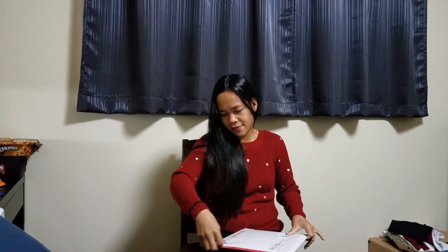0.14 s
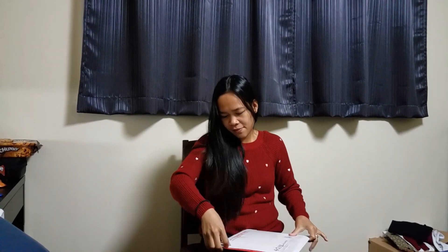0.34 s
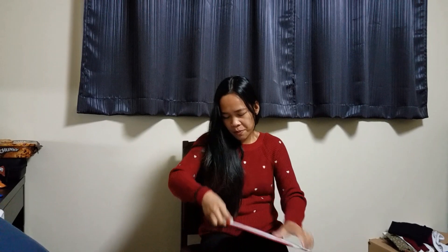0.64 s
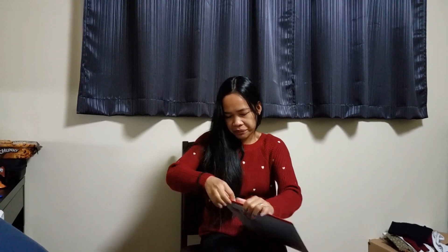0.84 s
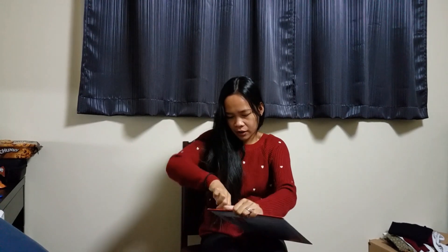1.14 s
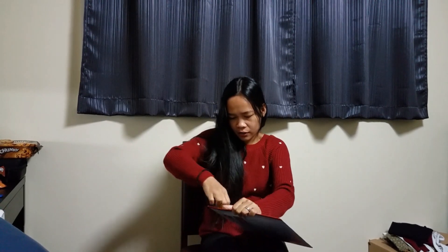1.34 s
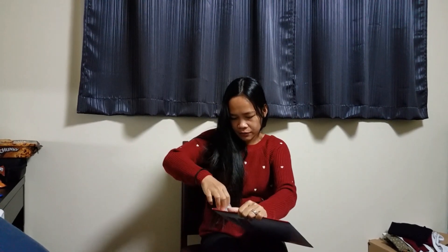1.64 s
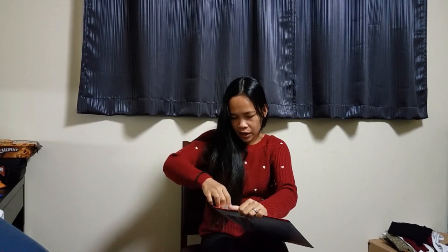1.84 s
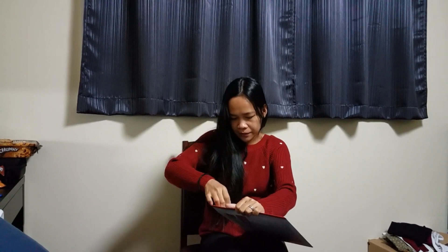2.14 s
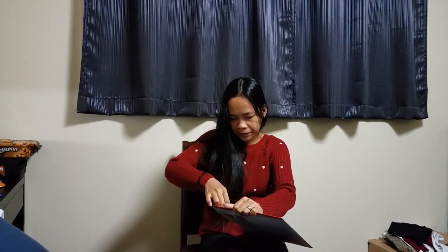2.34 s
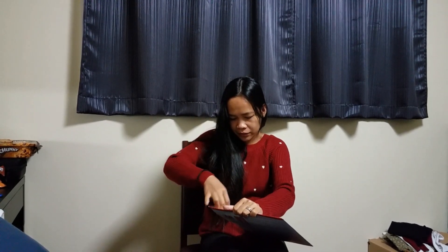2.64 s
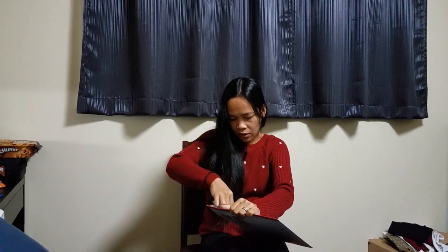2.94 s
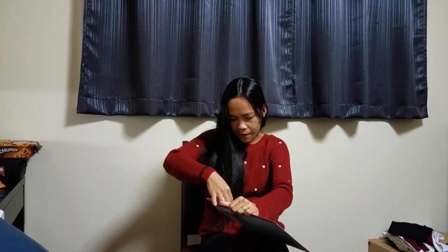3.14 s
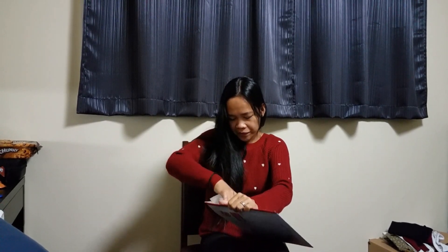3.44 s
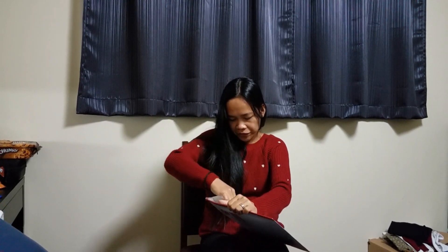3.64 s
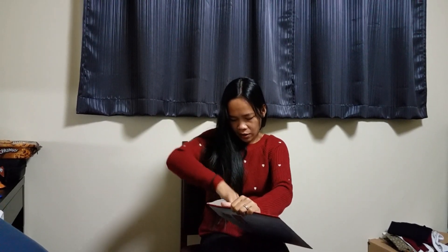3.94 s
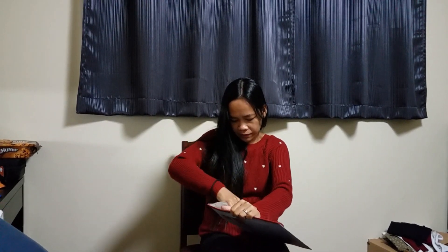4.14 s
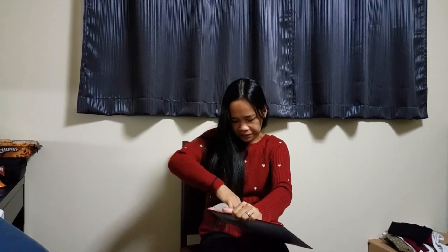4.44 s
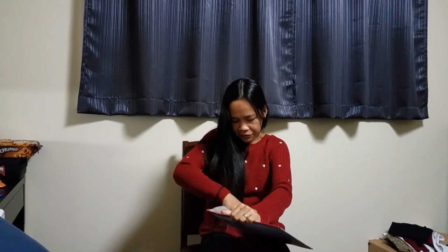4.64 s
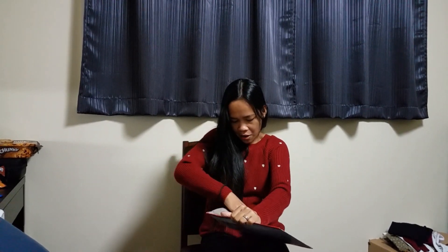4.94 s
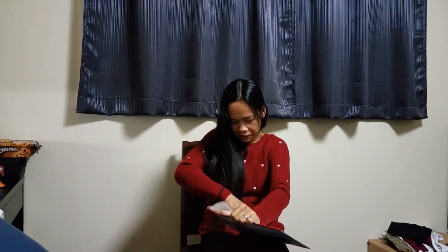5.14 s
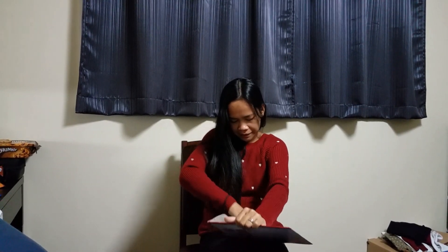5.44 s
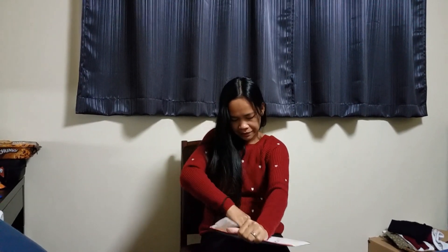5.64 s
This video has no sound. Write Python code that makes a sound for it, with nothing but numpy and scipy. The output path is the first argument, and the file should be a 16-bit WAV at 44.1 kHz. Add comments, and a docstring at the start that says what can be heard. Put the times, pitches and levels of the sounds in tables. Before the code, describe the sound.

In a small, quiet room, fingers rustle on a stiff envelope and tear it open bit by bit. The first two rips stand apart, the second one louder; then a busier run of short, crackly tears follows, with the paper flexing and popping between them. The sound is clear at the microphone, with brief room reflections and a faint low hum underneath.

```python
"""Tearing open an envelope

A stiff paper envelope is torn open in ten short pulls, in a small room with a faint mains hum.
Fibres snap along the tear and flex the sheet; a short, hollow mid-range ring follows each break.
Between pulls the fingers rustle on the paper, and the sheet buckles with dull pops."""
import sys
import numpy as np
from scipy import signal
from scipy.fft import rfft, irfft
from scipy.io import wavfile
from scipy.ndimage import uniform_filter1d

SR = 44100
rng = np.random.default_rng(int(sys.argv[2]) if len(sys.argv) > 2 else 0)


def transcribe(u):
    """Save the signal u as a 16-bit wav file named by the first command-line argument.

    u: samples, shape (n,) or (channels, n), limited to [-1, 1]; the rate is SR.
    q: integer samples, one column per channel.
    """
    v = np.clip(np.atleast_2d(u).T, -1, 1)
    q = np.round(v * 32767).astype(np.int16)
    wavfile.write(sys.argv[1], SR, q)


N = 255780
TIME = np.arange(N) / SR


def tearing():
    """One stream of fibre breaks sounds directly, through the sheet and through mid-range resonances."""
    # tone colours of the bright fibres and the flexing sheet: f/Hz, level/dB
    fibre_colour = [(150, -27.5), (1000, -39.5), (3000, 2), (4300, -19.5), (5800, 0.5), (8000, 5.5),
                    (10500, 7.5), (13000, 10), (15800, 5.5)]
    sheet_colour = [(60, -38), (130, -1), (220, 6), (330, -2), (550, 3), (800, 0.5), (1100, 4.5), (1500, 9),
                    (2200, 7.5), (3100, 9.5), (4200, 2.5), (7000, -14), (16000, -83)]
    fibre_gain, sheet_gain, ring_gain = handwork()
    breaks = grains(per_s=3800, spread_db=3.5, cap=3.6)
    rubbing = amp(-8.5) * rng.standard_normal((2, N))
    rip = evened(breaks + rubbing) * unsteady(depth_db=1.0, hz=151)  # the tear catches and runs
    # under a light touch the paper gives in separate crackles; a hard pull merges them
    crackles = grains(per_s=140, spread_db=5.0, cap=0.92)
    lightness = np.interp(20 * np.log10(fibre_gain), [-64, -48], [0.45, 0.08])
    drive = shifting(np.sqrt(1 - lightness) * rip + np.sqrt(lightness) * crackles, depth_db=2.5)
    fibres = filtered(drive * fibre_gain, coloured(fibre_colour))
    sheet = filtered(drive * sheet_gain, coloured(sheet_colour))
    ring = filtered(evened(drive.mean(0)) * ring_gain, hollow_ring())  # mono
    return amp(0.6) * fibres + amp(1) * sheet + ring


def handwork():
    """Grip, rips and rustles add in power to give the gain curves of fibres, sheet and ring."""
    # the held envelope crackles faintly all the while: t/s, level/dB
    grip = [(0, -74.5), (.35, -74), (.55, -75), (.7, -79), (1.2, -78), (1.6, -72), (2.12, -79.5),
            (2.6, -64), (2.78, -79), (2.95, -81), (3.2, -63.5), (3.8, -66), (4.33, -66.5), (4.55, -57.5),
            (4.98, -66), (5.25, -62.5), (5.4, -64), (5.8, -57)]
    # the tear runs a little way: t/s, swell/s, ebb/s, fibre level/dB,
    # then relative to the fibres: sheet/dB, ring/dB, strain before the tear/dB
    rips = [(0.209, 0.0052, 0.01, -40.5, -5, -9.5, -22), (1.332, 0.055, 0.027, -27, -8, -17, -37.5),
            (2.393, 0.052, .055, -43, -8, -16.5, -12.5), (2.987, 0.071, 0.04, -39.5, -5.5, -10, -12),
            (3.619, 0.049, 0.028, -38, -3.5, -4, -16.5), (4.068, 0.0065, 0.084, -42, -2, -8.5, -10.5),
            (4.165, 0.066, 0.042, -43, -6.5, -6, -4), (4.635, 0.0092, 0.059, -40, -7.5, -7.5, -9.5),
            (5.104, 0.021, 0.048, -37.5, -5, -7.5, -8.5), (5.547, .014, 0.069, -36.5, -4.5, -11, -13.5)]
    # fingers slide to a new hold: middle t/s, half length/s, fibre level/dB,
    # then relative to the fibres: sheet/dB, ring/dB
    rustles = [(.068, 0.02, -62, -11, -22), (0.13, .02, -64, -11, -22), (0.576, .05, -68.5, -8, -18),
               (.785, 0.039, -65.5, -1, -15), (1.287, .035, -65, -19, -24), (1.519, 0.014, -50, 2, -16),
               (1.838, 0.088, -65, -2, -11.5), (2.027, 0.03, -65, -5, -22), (2.215, 0.035, -58, -9, -11),
               (2.323, 0.037, -85, -11, -22), (2.618, 0.022, -66, 4.5, -4),
               (2.825, 0.016, -51, -4.5, -10.5), (2.871, 0.017, -51, -3.5, -8), (3.312, 0.03, -58, -2, -7),
               (3.386, 0.037, -57, -1.5, -4), (3.466, 0.029, -49.5, -4.5, -29),
               (3.912, 0.051, -57.5, -1, -5.5), (4.414, 0.085, -62.5, -1.5, -1), (4.72, 0.03, -56, -4, -3),
               (4.804, 0.074, -60.5, 4.5, -1), (4.87, 0.018, -56, -1, 4), (5.314, 0.04, -55.5, -1.5, 0),
               (5.476, 0.05, -53, -7.5, -24), (5.79, 0.05, -53.5, 1, 2)]
    moves = [(amp(np.interp(TIME, *np.transpose(grip))), -2, -13)]  # fibre gain, sheet/dB, ring/dB
    for start, swell, ebb, db, sheet_db, ring_db, strain_db in rips:
        moves.append((amp(db + rip_db(start, swell, ebb, strain_db)), sheet_db, ring_db))
    for middle, half, db, sheet_db, ring_db in rustles:
        moves.append((amp(db) * np.exp(-((TIME - middle) / half) ** 2), sheet_db, ring_db))
    power = sum(np.outer(amp([0, sheet_db, ring_db]), gain) ** 2 for gain, sheet_db, ring_db in moves)
    return np.sqrt(power)


def rip_db(start, swell, ebb, strain_db):
    """Level through one rip: the strain builds, the paper gives, the tear speeds up, slows and stops."""
    strain_s, strain_rise_db = 0.1, 18
    attack_s, release_s, release_db = 0.01, 0.052, -39
    swell_db_per_s, ebb_db_per_s = 118, 89
    gives, end = start - attack_s, start + swell + ebb
    s = [gives - strain_s, gives, start, start + swell, end, end + release_s]
    db = [strain_db - strain_rise_db, strain_db, -swell_db_per_s * swell, 0, -ebb_db_per_s * ebb, release_db]
    return np.interp(TIME, s, db, left=-np.inf, right=-np.inf)


def grains(per_s, spread_db, cap):
    """Random clicks, many small and a few large; each radiates unevenly to left and right."""
    size = amp(spread_db * np.minimum(rng.exponential(1, N), cap))
    clicks = size * rng.choice([-1, 1], N) * (rng.random(N) < per_s / SR)
    return evened(clicks * (1 + 1.39 * rng.standard_normal((2, N))))


def shifting(x, depth_db, frames=5, bins=11):
    """The tear keeps moving on to other fibres, so its colour changes from one instant to the next."""
    spectra = signal.stft(x, nperseg=256)[2]
    noise = rng.standard_normal(spectra[0].T.shape)
    patches = uniform_filter1d(uniform_filter1d(noise, frames, 0), bins, 1)
    gain = evened(amp(depth_db * np.clip(evened(patches), -2, 2)))
    return signal.istft(spectra * gain.T, nperseg=256)[1][:, :N]


def hollow_ring(size=3000):
    """A short, hollow ring near 700-900 Hz after a click, with neither deep bass nor treble."""
    # mid-range resonances of constant pitch: f/Hz, width/Hz, level/dB
    modes = [(537, 390, -0.5), (684, 41, -9), (720, 19, 13), (790, 40, 14), (903, 40, 17),
             (1010, 540, -3.5), (1226, 150, -14), (1320, 42, -2)]
    t = np.arange(size) / SR
    ring = sum(amp(db) * width * np.exp(-np.pi * width * t) * np.cos(2 * np.pi * hz * t)
               for hz, width, db in modes)
    ring = signal.sosfilt(signal.butter(2, [380, 1600], "band", fs=SR, output="sos"), ring)
    return ring / np.linalg.norm(ring)


def snaps():
    """Fibre bundles and fingernails snap: each is a bright click with a brief splinter after it."""
    # single snaps: t/s, relative level/dB
    hits = [(0.0516, -38), (0.2126, -19), (0.216, -16), (0.9984, -33), (1.306, -48), (1.3295, -17.5),
            (1.352, -35), (1.6496, -43), (1.71, -37.5), (1.766, -36), (1.839, -35), (1.9337, -35.5),
            (2.2595, -38), (2.370, -44), (2.388, -29), (2.621, -38), (2.8006, -39), (3.0523, -25),
            (3.466, -27.5), (3.614, -45), (4.8653, -30), (5.1102, -8), (5.552, -19), (5.567, -25),
            (5.615, -31)]
    # their tone colour: f/Hz, level/dB
    colour = [(300, 3), (1000, -14.5), (3000, -4.5), (4500, -8.5), (7500, -1.5), (11000, -3), (15800, -9.5)]
    out, t, click = np.zeros(N), np.arange(256) / SR, coloured(colour)
    for s, db in hits:
        splinter = 0.26 * rng.standard_normal(len(t)) * np.exp(-t / 0.00049)
        sound = np.convolve((t == 0) + splinter, click)
        add(out, s, peaked(sound, db))
    # snaps carry no bass below about 500 Hz
    return signal.sosfilt(signal.butter(3, 500, "high", fs=SR, output="sos"), out)


def pops():
    """The sheet flips over and flutters; a larger patch sounds lower. Gives dry sound and room send."""
    # buckles and knocks: t/s, relative level/dB, centre f/Hz, half width/octaves,
    # room send/dB (higher when the patch faces away)
    buckles = [(0.773, -48, 213, 0.58, 1.5), (0.9567, -43.5, 480, 1.44, -9), (1.3299, -24, 773, 0.4, -9.5),
               (1.65, -37, 1490, 2.06, 0), (1.7435, -47.5, 1800, 0.17, -9), (1.751, -46, 1800, 0.17, -8),
               (2.199, -49, 800, 0.36, -1), (2.74, -37.5, 1270, 1.8, -0.5), (3.3336, -34, 764, 0.23, -3),
               (3.379, -44, 1630, 0.34, 6), (3.434, -45.5, 417, 0.29, -5), (3.615, -29.5, 1020, 2.3, 4.5),
               (3.6551, -21, 790, 0.31, -2), (3.915, -35.5, 885, 0.4, -7), (4.070, -19.5, 1350, 1.11, -1),
               (4.2146, -15.5, 2390, 0.48, 1.5), (4.2159, -10, 913, 0.85, 1), (4.2293, -22, 750, 1.1, -13),
               (4.6436, -29, 1170, 1.09, 11.5), (4.8385, -25.5, 2200, 0.32, -6),
               (4.867, -30, 950, 1.68, 8.5), (5.114, -26.5, 790, 0.34, -2.5), (5.309, -38, 1360, 1.17, 6),
               (5.427, -42.5, 725, 0.67, -3.5), (5.5387, -30.5, 745, 0.37, 2.5),
               (5.757, -28.5, 840, 0.62, -1)]
    near, send, t = np.zeros(N), np.zeros(N), np.arange(1024) / SR
    thump = band_click(centre_hz=241, octaves=0.58)
    for s, db, centre_hz, octaves, room_db in buckles:
        flutter = evened(rng.standard_normal(len(t))) * np.exp(-t / 0.0023)
        body = np.convolve((t == 0) + 0.1 * flutter, band_click(centre_hz, octaves))
        crackle = (t == 0) + 0.14 * flutter
        sound = peaked(body, db)
        add(sound, 0, peaked(crackle, min(db + 3, -28)))  # fibres crack too, but only so many
        add(sound, 0.00707, peaked(thump, db - 24.5))  # the whole envelope follows with a soft push
        add(near, s, sound)
        add(send, s, amp(room_db) * sound)
    return near, send


def room(x, positions=7, moves_per_s=9):
    """Hands and envelope move, so the sound crossfades from one set of reflections to the next."""
    place = TIME * moves_per_s % positions
    out = np.zeros((2, N))
    for k in range(positions):
        away = abs((place - k + positions / 2) % positions - positions / 2)
        fade = np.cos(np.pi / 2 * np.minimum(away, 1))
        out += filtered(x * fade, reflections())
    return out


def reflections(size=20000):
    """A few early echoes and a short diffuse stereo tail for one position of the paper."""
    # room decay: f/Hz, T60/s
    decay = [(150, 0.36), (500, 0.25), (1400, 0.24), (3700, 0.24), (10000, 0.16), (16000, 0.2)]
    # bounces off the lap and near walls: delay/s, level/dB
    echoes = [(.0021, -16.5), (.0064, -15.5), (.0083, -19.5), (0.0148, -12.5)]
    hz, t, spectra = signal.stft(rng.standard_normal((2, size)), SR, nperseg=256)
    alike = read([(150, 0.68), (600, 0.91), (1400, 0.037)], hz)[:, None]  # long waves reach both sides
    spectra[1] = alike * spectra[0] + np.sqrt(1 - alike ** 2) * spectra[1]
    tail = signal.istft(spectra * amp(-60 * t / read(decay, hz)[:, None]), SR, nperseg=256)[1]
    tail *= 1 - np.exp(-np.arange(tail.shape[1]) / SR / 0.0011)  # soft onset
    tail /= np.linalg.norm(tail, axis=1, keepdims=True)
    soft_click = signal.windows.hann(5)[1:-1]
    for delay, db in echoes:
        for channel in tail:
            add(channel, delay + rng.uniform(-0.0007, 0.0007), amp(db) * soft_click)
    return tail


def room_tone(air_db=-60.5, hum_hz=99.2, hum_db=-73):
    """Low rumble and thin hiss, with a faint, wavering mains hum."""
    # tone colour of the still room: f/Hz, relative level/dB
    colour = [(20, -11.5), (45, -9.5), (70, -14.5), (102, 0), (135, -11.5), (170, -14.5), (250, -9),
              (350, -16.5), (600, -19.5), (1000, -24), (2500, -26), (5500, -35), (9000, -32.5),
              (13000, -31.5), (15800, -27.5)]
    hz = np.fft.rfftfreq(N, 1 / SR)
    left, other = rfft(rng.standard_normal((2, N))) * amp(read(colour, hz))
    alike = read([(100, 0.87), (500, 0.35), (2000, 0.051)], hz)  # centred rumble, wide hiss
    right = alike * left + np.sqrt(1 - alike ** 2) * other
    air = irfft(np.array([left, right]), N)
    hum = np.sqrt(2) * np.sin(2 * np.pi * hum_hz * TIME) * unsteady(depth_db=3.0, hz=11)
    return amp(air_db) * evened(air) + amp(hum_db) * hum * amp([[-1], [1]])


def unsteady(depth_db, hz):
    """A gain that wanders at random, of mean power 1."""
    wander = signal.sosfilt(signal.butter(2, hz, fs=SR, output="sos"), rng.standard_normal(N))
    return evened(amp(depth_db * np.clip(evened(wander), -2, 2)))


def pulse(gain_at, size=2048):
    """The sharpest causal click with the given spectrum, of unit energy."""
    hz = abs(np.fft.fftfreq(size, 1 / SR))
    log_gain = np.log(np.maximum(gain_at(hz), 1e-5))
    spectrum = np.exp(np.conj(signal.hilbert(log_gain)))  # minimum phase
    click = np.fft.ifft(spectrum).real[:size // 2]
    return click / np.linalg.norm(click)


def coloured(points):
    """A click with the tone colour of a table of f/Hz, level/dB."""
    return pulse(lambda hz: amp(read(points, hz)))


def band_click(centre_hz, octaves):
    """A click confined to a band of the given half width."""
    return pulse(lambda hz: (1 + (np.log2((hz + 1) / centre_hz) / octaves) ** 6) ** -0.5)


def filtered(x, response):
    """A sound played through an impulse response, cut to the scene's length."""
    return signal.oaconvolve(np.atleast_2d(x), np.atleast_2d(response), axes=1)[:, :N]


def amp(db):
    """Decibels as a gain."""
    return 10 ** (np.asarray(db) / 20)


def evened(x):
    """Scaled to mean power 1."""
    return x / np.sqrt(np.mean(x ** 2) + 1e-20)


def peaked(x, db):
    """Scaled to the given peak level."""
    return amp(db) * x / abs(x).max()


def read(points, hz):
    """A curve through the points on a log-frequency axis."""
    f, value = np.transpose(points)
    return np.interp(np.log(hz + 1), np.log(f + 1), value)


def add(mix, s, sound):
    """Mix a sound in at s seconds."""
    part = mix[max(round(s * SR), 0):][:len(sound)]
    part += sound[:len(part)]


def scene():
    """The paper in its room: its treble leans left, its body right, and the left side leads."""
    # stereo lean of the paper: f/Hz, left minus right level/dB
    balance = [(100, -3), (700, -3), (1300, -0.5), (2400, 2), (4400, 1.5), (8000, 7.5), (15000, 2)]
    tear = amp(-3) * tearing()
    snap = amp(-2.5) * snaps()
    pop, pop_send = pops()
    direct = tear + snap + amp(-4) * pop
    paper = direct + room(amp(0.5) * (tear + snap) + amp(-1.5) * pop_send)
    # the paper's sound carries no deep bass below about 95 Hz
    paper = signal.sosfilt(signal.butter(3, 95, "high", fs=SR, output="sos"), paper)
    hz = np.fft.rfftfreq(N, 1 / SR)
    lean_db = read(balance, hz) / 2
    lead_rad = read([(300, 0.17), (800, 0.18), (2500, 0.51), (8000, 0.87)], hz)
    pan = np.array([amp(lean_db) * np.exp(1j * lead_rad), amp(-lean_db)])
    return irfft(rfft(paper) * pan, N) + room_tone()


def record(dry):
    """A steep low-pass trims the very top of the treble."""
    low_pass = signal.firwin(511, 15930, window=("kaiser", 9), fs=SR)
    return signal.oaconvolve(dry, low_pass[None], "same")


dry = scene()
out = record(dry)
transcribe(out)
```